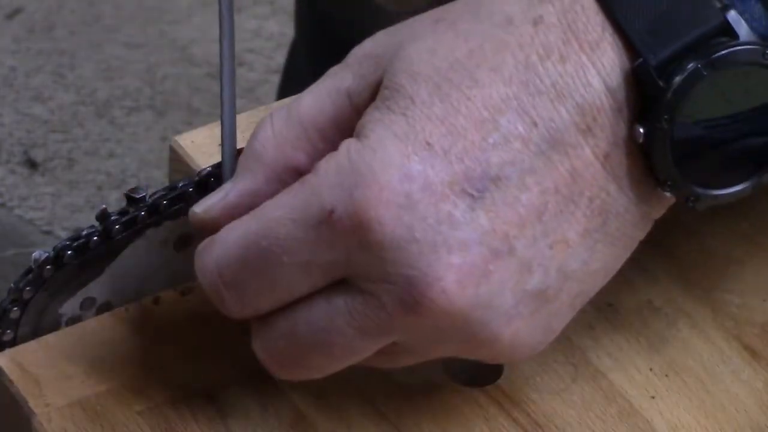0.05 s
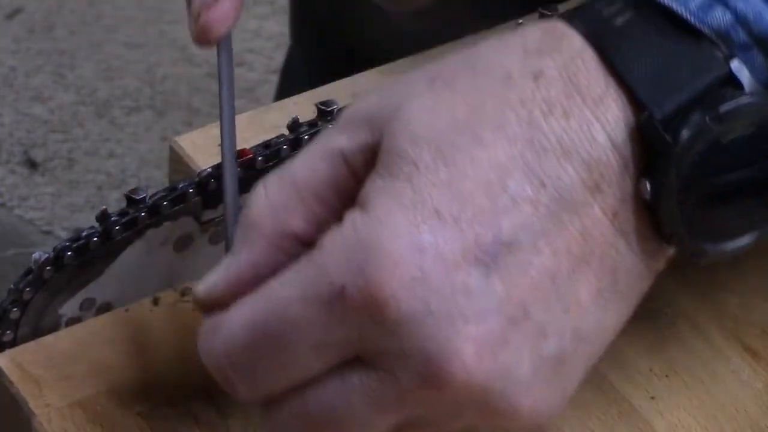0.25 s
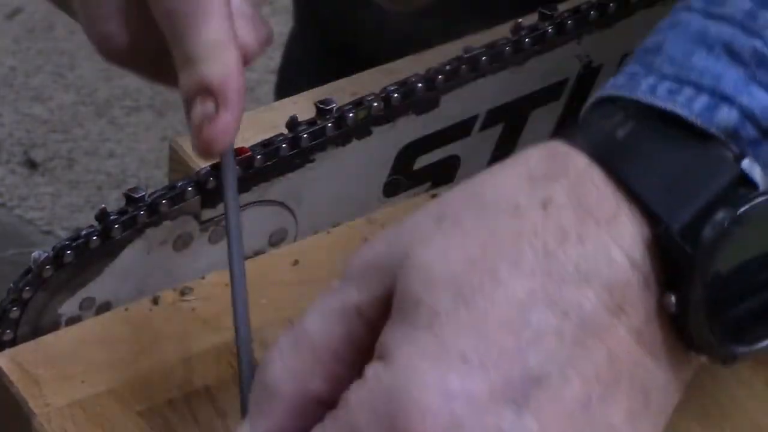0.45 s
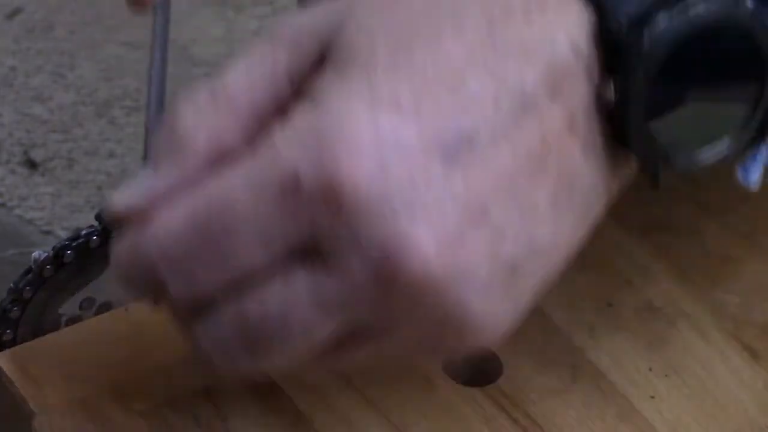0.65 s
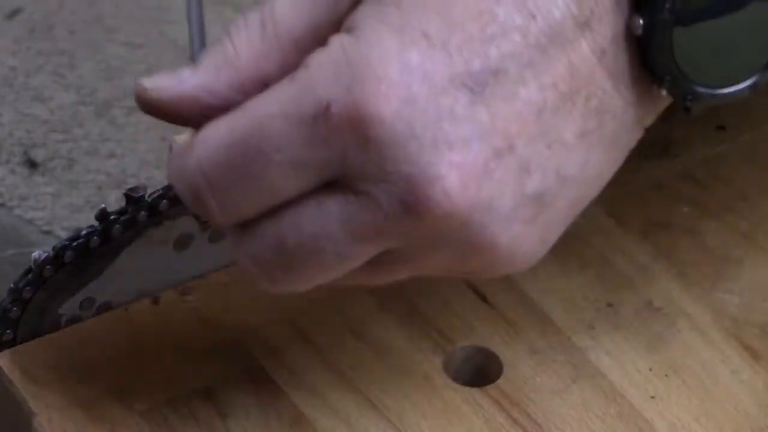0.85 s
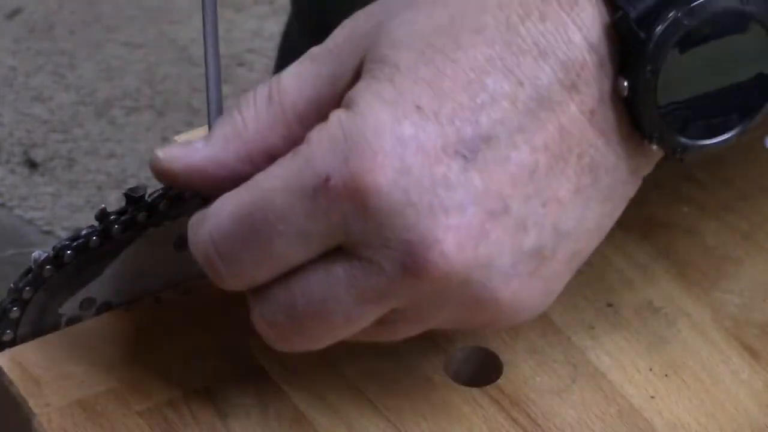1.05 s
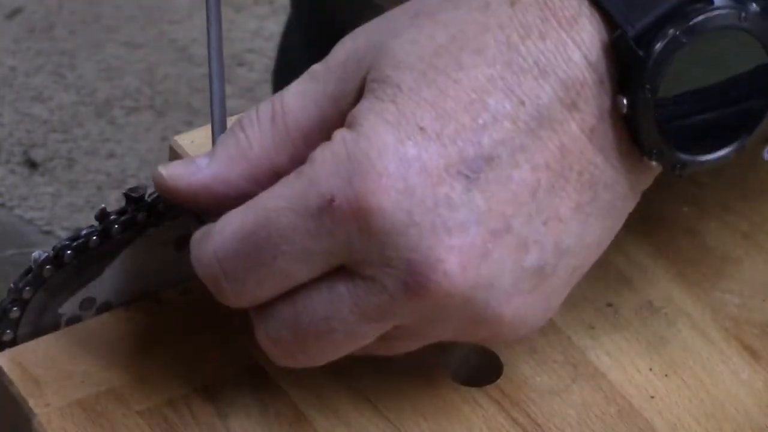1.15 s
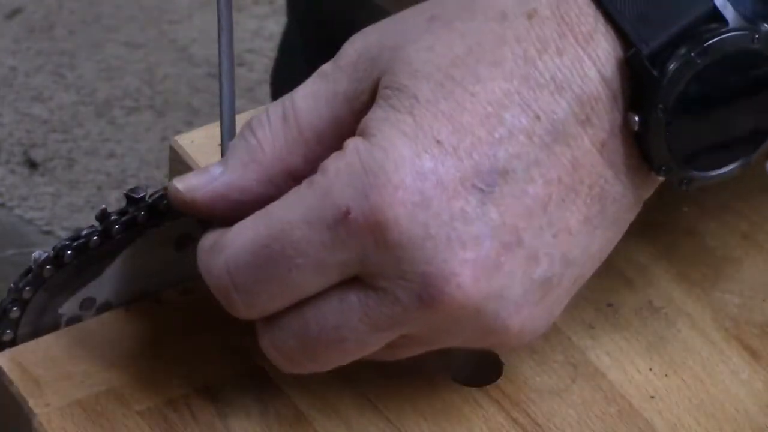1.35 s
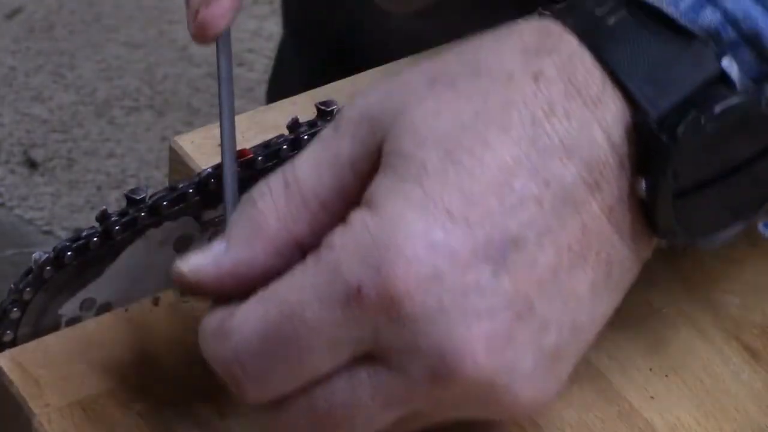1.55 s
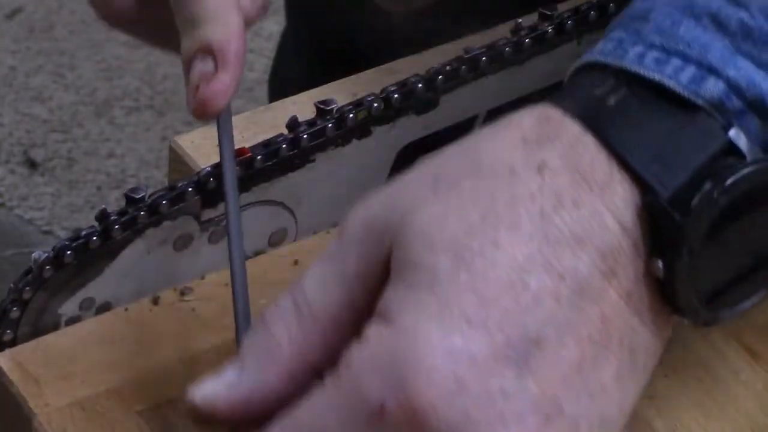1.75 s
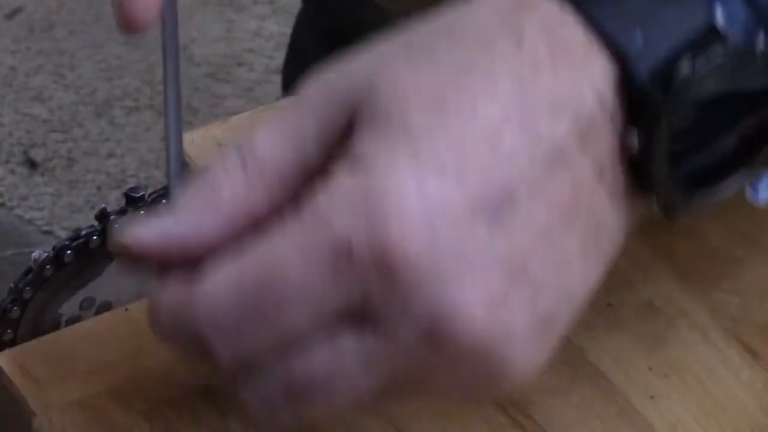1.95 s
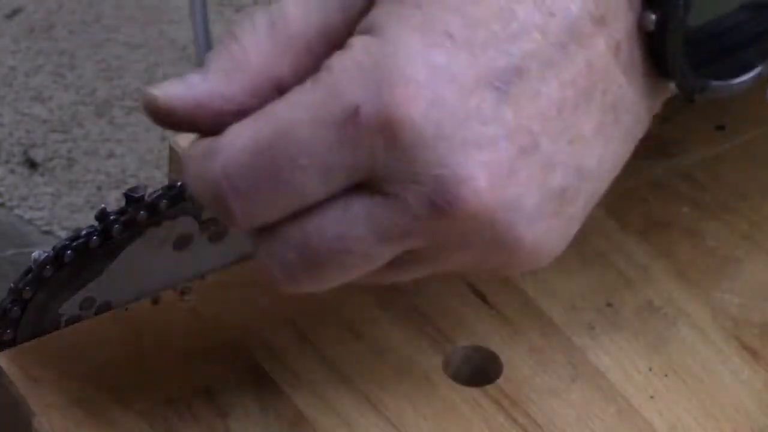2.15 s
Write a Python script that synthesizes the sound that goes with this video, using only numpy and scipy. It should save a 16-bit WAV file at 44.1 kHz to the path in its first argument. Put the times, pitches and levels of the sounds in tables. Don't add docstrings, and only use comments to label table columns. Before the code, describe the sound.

A round file rasps twice through a saw-chain cutter, with light metal taps before each push

```python
import sys
import numpy as np
from scipy import signal
from scipy.fft import rfft, irfft, next_fast_len
from scipy.io import wavfile
from scipy.ndimage import uniform_filter1d, minimum_filter1d, map_coordinates

SR = 44100
rng = np.random.default_rng(int(sys.argv[2]) if len(sys.argv) > 2 else 0)


def persist_wave(psi):
    counts = np.round(np.clip(psi, -1, 1) * 32767).astype(np.int16)
    wavfile.write(sys.argv[1], SR, np.atleast_2d(counts).T)


def voltage_ratio(decibels):
    exponent = np.asarray(decibels, float) / 20
    return 10 ** exponent


N = 97020
BITES_PER_S = 9000


def unit(x):
    return x / np.sqrt(np.mean(x ** 2) + 1e-20)


def along(points, hz):
    point_hz, value = np.transpose(points)
    return np.interp(np.log(hz + 1), np.log(point_hz + 1), value)


def curve(rows, column=1, outside=-120):
    rows = np.array(rows)
    return np.interp(np.arange(N) / SR, rows[:, 0], rows[:, column], outside, outside)


def wobble(rate_hz):
    return map_coordinates(rng.standard_normal(400), [np.arange(N) * min(rate_hz, 150) / SR])


def filtered(x, response):
    m = next_fast_len(N + SR // 2)
    return irfft(rfft(x, m) * response(np.fft.rfftfreq(m, 1 / SR)), m)[..., :N]


def coloured(x, spectrum):
    return unit(filtered(x, lambda f: voltage_ratio(along(spectrum, f))))


def mode(x, hz, width_hz):
    def resonance(f):
        damping = 1j * f * width_hz
        return (damping / (hz * hz - f * f + damping)) ** 2
    return filtered(x, resonance) * np.sqrt(SR / width_hz)


def locked(ring):
    lock, lock_s = .5, .025
    swing = np.sqrt(np.abs(uniform_filter1d(ring ** 2, size=round(lock_s * SR))) + 1e-9)
    return unit(ring / swing ** lock)


def bites(rate_hz):
    spread_db = 3
    hit = rng.random(N) < rate_hz / SR
    return unit(hit * rng.standard_normal(N) * voltage_ratio(spread_db * rng.standard_normal(N)))


def background():
    # hz, density_db_per_hz
    air_spectrum = [(25, -23), (60, -13.5), (150, -10), (260, -6), (500, -5.5), (1000, -5.5), (2500, -21),
                    (15700, -43)]
    # hz, width_hz, level_db
    hum_bands = [(248, 30, -48.5), (264.6, 50, -59.5), (666.5, 8.3, -54.5), (870, 8.3, -54),
                 (1042, 43, -59.5)]
    air_db, air_wander_db, hum_wander_db = -44, 0.13, 1.5
    hum = 0
    for hz, width_hz, level_db in hum_bands:
        band = locked(mode(rng.standard_normal(N), hz, width_hz))
        hum = hum + voltage_ratio(level_db + hum_wander_db * wobble(9.6)) * band
    air = coloured(rng.standard_normal(N), air_spectrum)
    return voltage_ratio(air_db + air_wander_db * wobble(5.7)) * air + hum


def slides():
    # time_s, level_db
    slide_paths = [
        [(0, -72), (.035, -35.5), (.058, -35), (.08, -62), (.16, -38.5), (.17, -75)],
        [(1.05, -81), (1.2, -53), (1.24, -45.5), (1.33, -36), (1.44, -50.5), (1.47, -44), (1.49, -77)],
    ]
    # hz, density_db_per_hz
    slide_spectrum = [(100, -44), (180, -5.5), (400, 0), (900, -10), (1600, -14), (2400, -23),
                      (3500, -29.5), (12000, -57)]
    # time_s, level_db
    creep_path = [
        (1.08, -63),
        (1.14, -49.5),
        (1.22, -45),
        (1.25, -60),
    ]
    creep_hz, creep_width_hz = 860, 260
    level_db = np.max([curve(rows) for rows in slide_paths], axis=0)
    drag = voltage_ratio(level_db + 0.72 * wobble(58.3)) * coloured(bites(BITES_PER_S), slide_spectrum)
    creep = unit(mode(bites(BITES_PER_S), creep_hz, creep_width_hz))
    return drag + voltage_ratio(curve(creep_path)) * creep


def taps():
    # time_s, knock_db, snap_db
    tap_events = [
        (1.2304, -6, -12),
        (1.2319, -5.5, -26),
        (1.2463, -10.5, -47),
        (0.0568, -19, -23.5),
        (.1765, -19, -37),
        (.2003, -28, -11),
        (1.479, -30, -39),
    ]
    # hz, width_hz, level_db
    knock_modes = [(650, 600, -9), (1150, 600, -4), (1520, 450, 0), (2050, 800, -5)]
    # hz, width_hz, level_db
    snap_modes = [(2600, 1600, 1), (3650, 700, -5), (4900, 800, -10), (6500, 1100, -21), (8100, 1400, -16),
                  (9900, 1100, -17)]
    tap_db, rattle_db, rattle_t60_s = -14, -15, 0.031
    t = np.arange(SR // 10) / SR
    click = t == 0
    blows = np.zeros((2, N + SR))
    for time_s, *levels_db in tap_events:
        rattle = voltage_ratio(rattle_db - 60 * t / rattle_t60_s) * rng.standard_normal(len(t))
        start = round(time_s * SR)
        blows[:, start:start + len(t)] += voltage_ratio(np.c_[levels_db] + tap_db) * (rattle + click)
    out = np.zeros(N)
    for blow, modes in zip(blows, (knock_modes, snap_modes)):
        for k, (hz, width_hz, level_db) in enumerate(modes):
            gain = (-1) ** k * voltage_ratio(level_db) * np.sqrt(SR / width_hz) / 4
            out += gain * mode(blow[:N], hz, width_hz)
    return out


def pushes():
    # time_s, pressure_db, file_to_bar_coupling_db
    strokes = [
        [(.172, -48, 10), (.179, -32.5, 12), (.198, -37, 14), (.202, -25, 1.5), (.265, -17.5, 6.5),
         (.37, -17, 11), (.46, -12.5, 5.5), (.535, -23.5, 19.5), (.58, -45, 19)],
        [(1.472, -48, 3), (1.481, -30.5, 5), (1.52, -27.5, 12), (1.59, -17, -15), (1.625, -15.5, -6),
         (1.68, -20, 15.5), (1.78, -15.5, -5.5), (1.865, -20, 19.5), (1.89, -76.5, 13)],
    ]
    # hz, width_hz
    bar_modes = [(142, 45), (272, 60), (335, 55), (397, 50), (450, 36), (618, 50), (662, 50), (765, 100),
                 (1087, 55), (1290, 55), (1725, 75), (1905, 60), (2385, 90), (3030, 190)]
    # file_tip_db, file_handle_db
    bar_feed = [(-38.5, -40), (-11, -22), (-14, -24), (-3, -8), (3, -5.5), (-4.5, -10.5), (-5.5, -7.5),
                (-25.5, -5.5), (-5, -13.5), (-27, -4), (-10.5, -14), (-12, -20.5), (-19.5, -30), (-13, -42)]
    # hz, width_hz, level_db
    cutter_modes = [(3950, 500, -35), (4700, 450, -39), (5250, 400, -40), (5950, 400, -43),
                    (7800, 1000, -41), (9000, 1200, -42), (11300, 900, -49), (12100, 500, -52),
                    (14300, 1300, -57)]
    # hz, density_db_per_hz
    rasp_spectrum = [(60, -57), (150, -23), (300, -1), (700, -4.5), (1800, -13), (5200, -32), (6300, -35.5),
                     (15700, -50)]
    chatter_db, rasp_db, cutter_db = 2.5, 1.5, -2.5
    top_db, ring_db, ring_growth = -15, -6.5, 1.33
    couple_hz = 900
    shift_power = 2.07

    def wander_db():
        return 1.7 * wobble(20)

    press_db = np.max([curve(rows) for rows in strokes], axis=0) + chatter_db * wobble(35.57)
    couple_db = sum(curve(rows, column=2, outside=0) for rows in strokes)
    travel = sum(curve([(rows[0][0], 0), (rows[-1][0], 1)], outside=0) for rows in strokes)
    shift = travel ** shift_power
    teeth = bites(BITES_PER_S)
    drive_db = top_db + ring_db + ring_growth * (press_db - top_db)

    out = voltage_ratio(press_db + rasp_db + 0.1 * couple_db) * coloured(teeth, rasp_spectrum)
    for (hz, width_hz), (tip_db, handle_db) in zip(bar_modes, bar_feed):
        coupled_db = couple_db / (1 + (hz / couple_hz) ** 2)
        feed_db = tip_db + (handle_db - tip_db) * shift
        gain = voltage_ratio(drive_db + coupled_db + feed_db + wander_db())
        gain = uniform_filter1d(gain, size=SR // width_hz // 2)
        out += gain * locked(mode(teeth, hz, width_hz))
    for hz, width_hz, level_db in cutter_modes:
        out += mode(teeth * voltage_ratio(press_db + level_db + cutter_db + wander_db()), hz, width_hz)
    return out


def whine():
    # time_s, tooth_rate_hz, level_db
    whine_path = [
        (1.88, 2400, -80),
        (1.92, 2405, -70),
        (1.96, 2370, -75),
        (1.99, 2270, -66),
        (2.02, 2110, -69),
        (2.045, 1890, -66),
        (2.055, 1830, -90),
    ]
    # order, level_db
    orders = [(4, -6), (5, 0)]
    phase = 2 * np.pi * np.cumsum(curve(whine_path, outside=2000)) / SR
    tone = sum(voltage_ratio(level_db) * np.sin(order * phase) for order, level_db in orders)
    return voltage_ratio(curve(whine_path, column=2) + 4.1 * wobble(80)) * tone


def room(x):
    # hz, t60_s
    decay = [(150, 0.53), (500, .55), (2000, 0.54), (6000, 0.55), (14000, 0.1)]
    # hz, level_db
    colour = [(300, -0.5), (1500, 0), (4000, -3.5), (12000, 0)]
    room_db, gap_s, tail_every_s = -5.5, .006, .05
    hop, gap = round(tail_every_s * SR), round(gap_s * SR)
    noise = rng.standard_normal((N // hop + 2, SR // 2))
    hz, t, z = signal.stft(noise, SR, nperseg=256)
    tails = signal.istft(z * voltage_ratio(-60 * t / along(decay, hz)[:, None]), SR, nperseg=256)[1]
    padded = np.pad(x, (hop, 3 * hop))
    window = np.sqrt(np.hanning(2 * hop))
    out = np.zeros(N + 2 * SR)
    for k, tail in enumerate(tails):
        piece = padded[k * hop:][:2 * hop] * window
        wet = signal.fftconvolve(piece, tail / np.linalg.norm(tail))
        out[k * hop + gap:][:len(wet)] += wet
    return filtered(out[hop:hop + N], lambda f: voltage_ratio(room_db + along(colour, f)))


def scene():
    top_hz, top_steepness, top_leak = 12200, 30, .2
    work = slides() + taps() + pushes()
    work = filtered(work, lambda f: 1 / (1 + (f / top_hz) ** top_steepness) ** .5 + top_leak)
    return (background() + work + room(work) + whine())[None]


def top_cut(x):
    return signal.sosfilt(signal.butter(12, 15760, fs=SR, output="sos"), x)


def record(dry):
    low_cut_hz, ceiling, hold_s = 79, .97, .006
    x = filtered(dry, lambda f: (1j * f / (low_cut_hz + 1j * f)) ** 2)
    hold = round(hold_s * SR)
    need = np.minimum(1, ceiling / (np.abs(x) + 1e-9))
    need = minimum_filter1d(need, size=2 * hold)
    return top_cut(x * uniform_filter1d(need, size=hold))


dry = scene()
out = record(dry)
persist_wave(out)
```